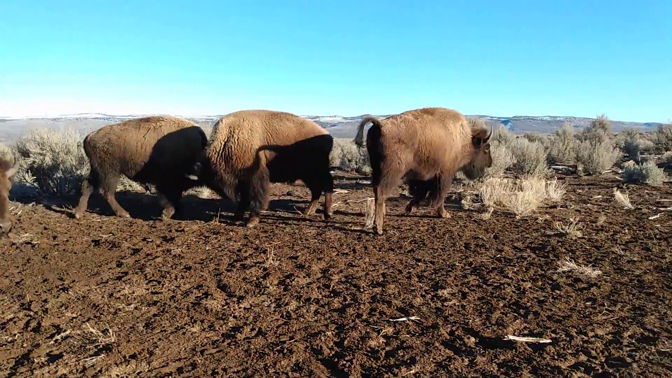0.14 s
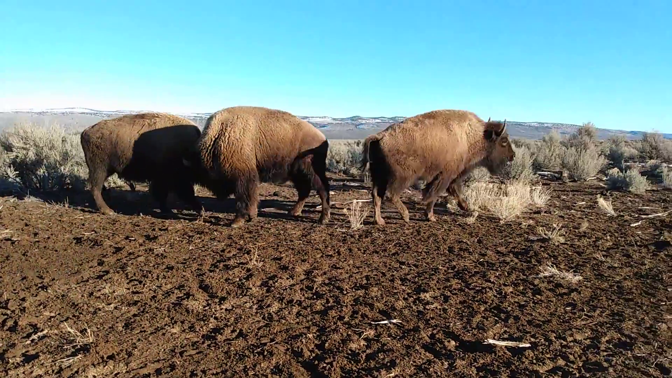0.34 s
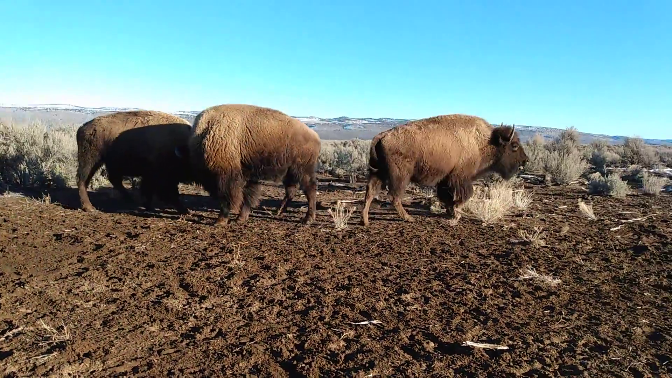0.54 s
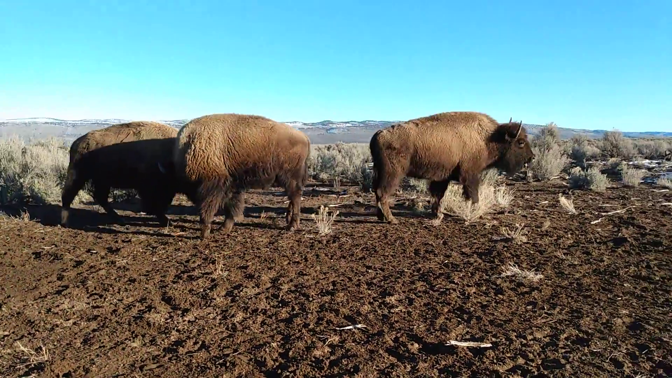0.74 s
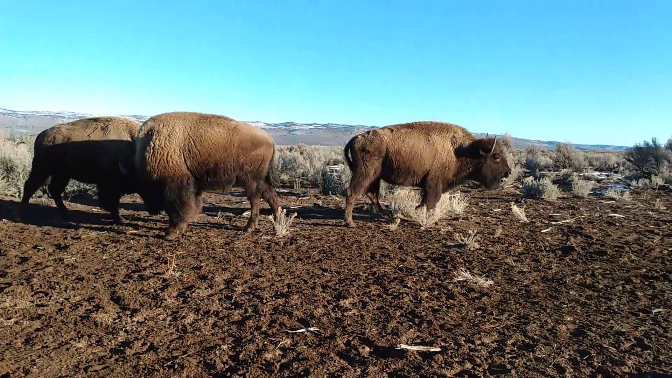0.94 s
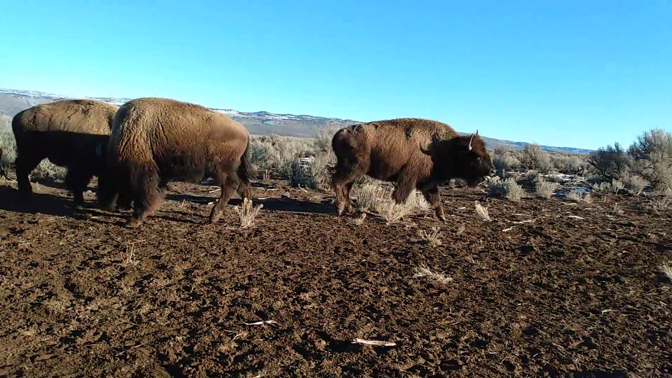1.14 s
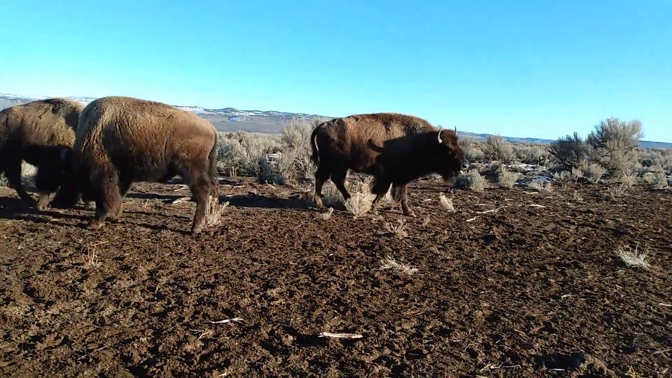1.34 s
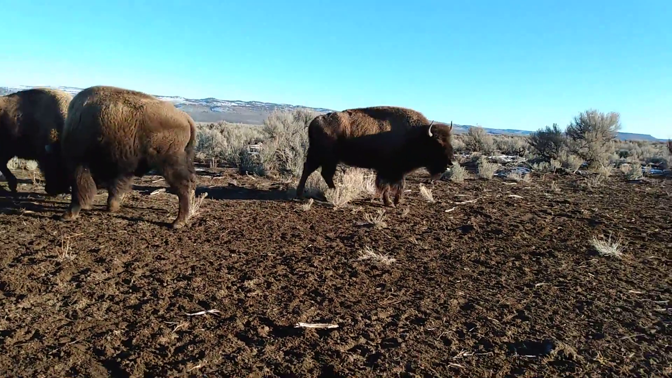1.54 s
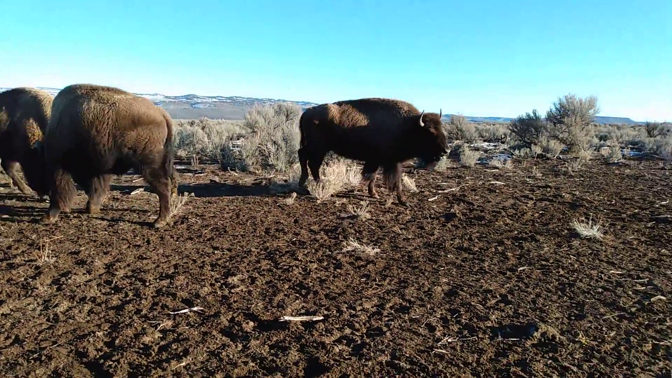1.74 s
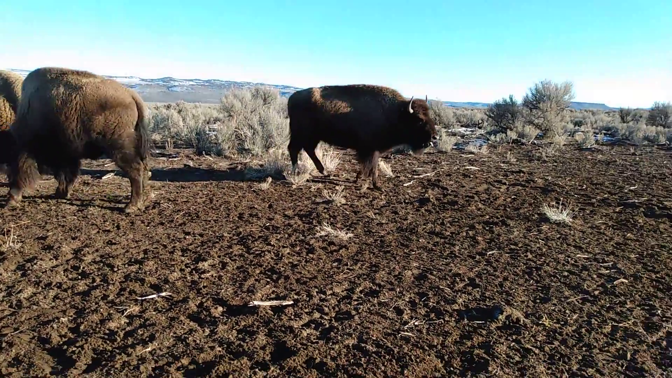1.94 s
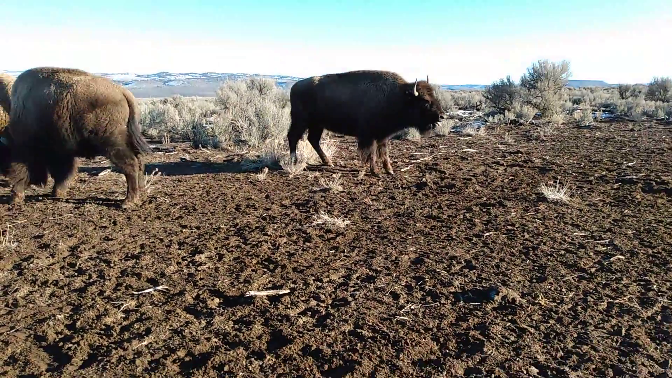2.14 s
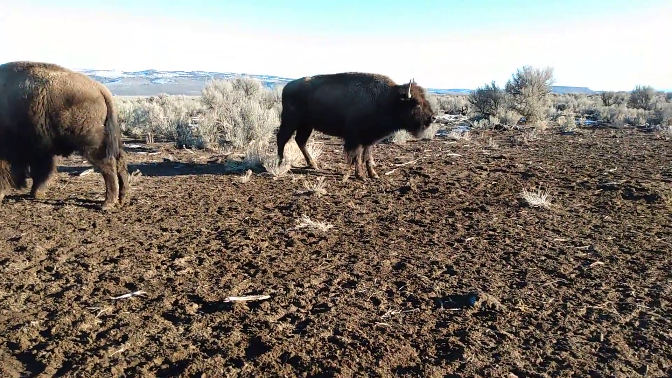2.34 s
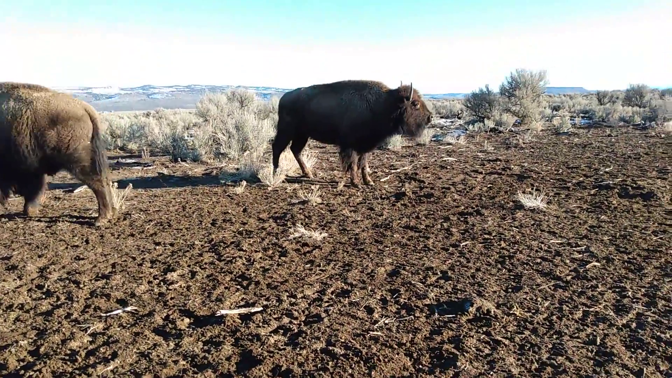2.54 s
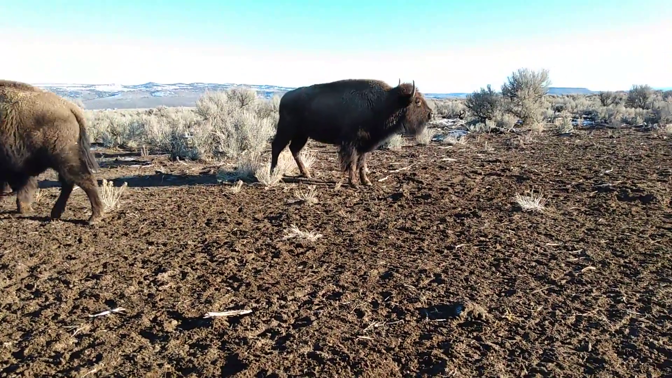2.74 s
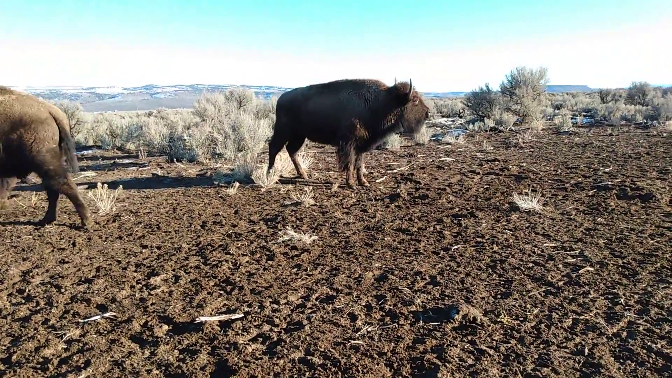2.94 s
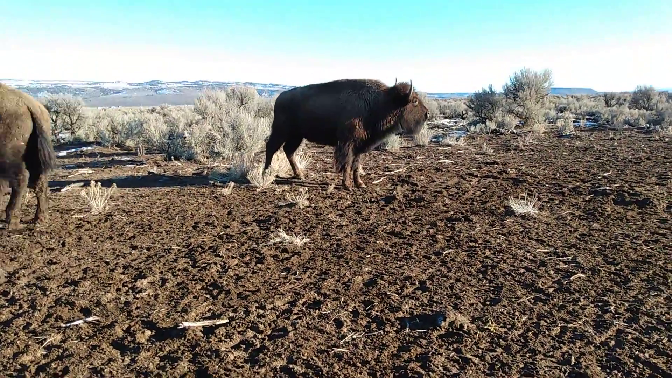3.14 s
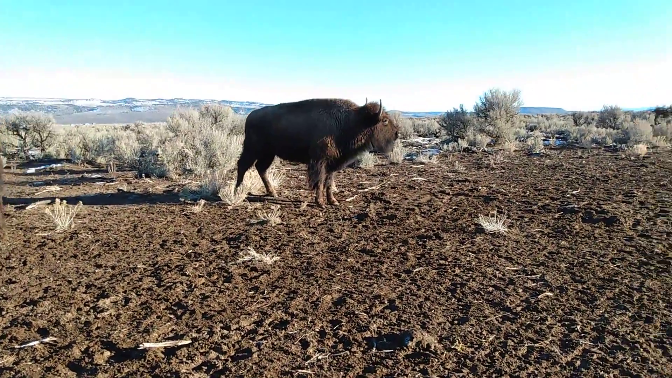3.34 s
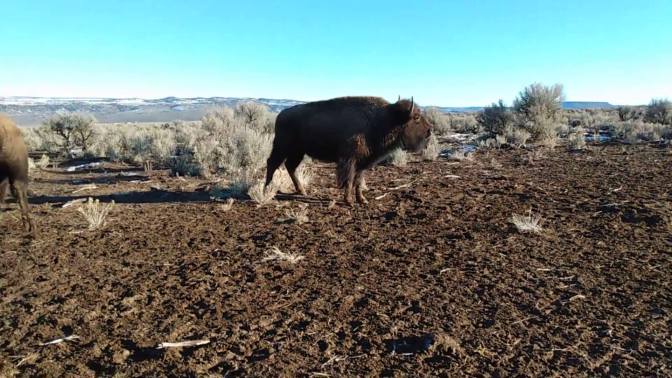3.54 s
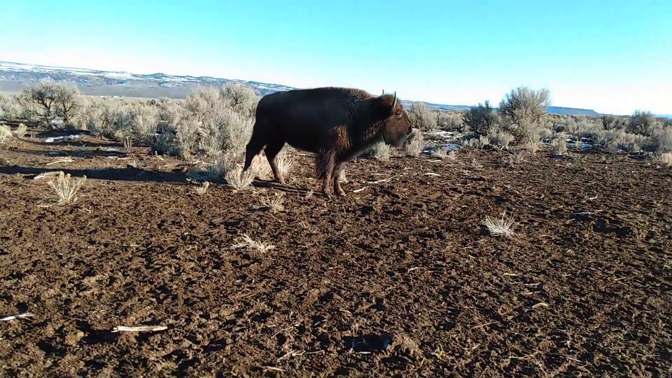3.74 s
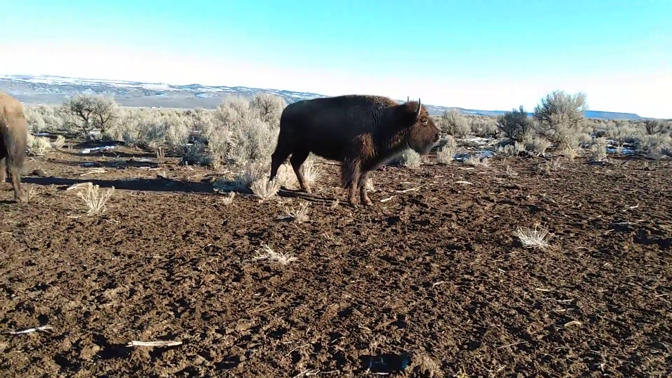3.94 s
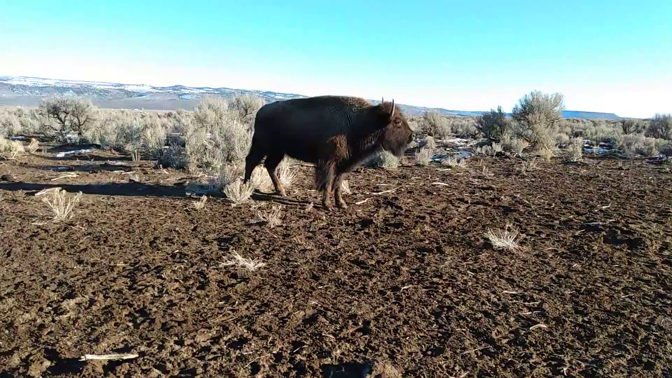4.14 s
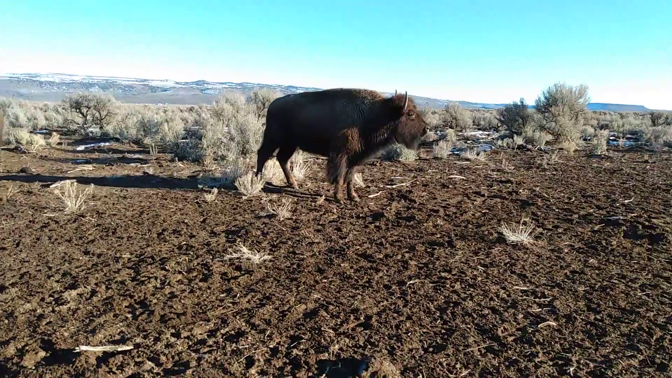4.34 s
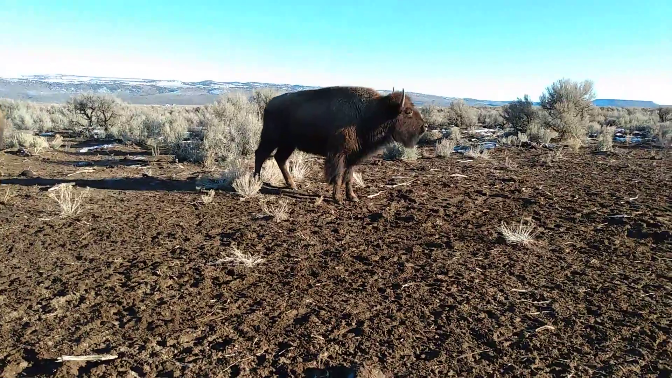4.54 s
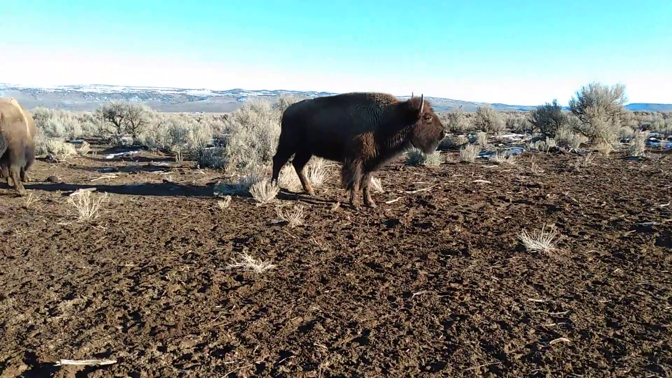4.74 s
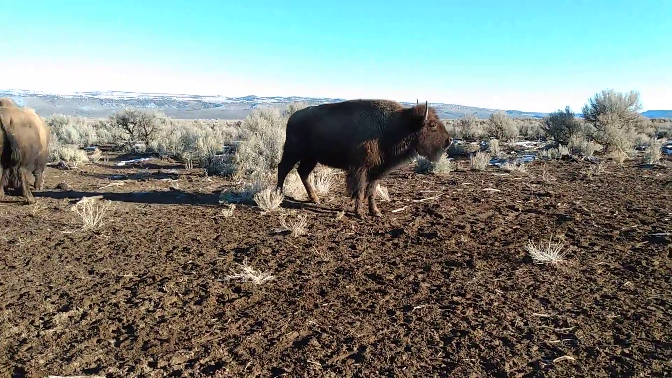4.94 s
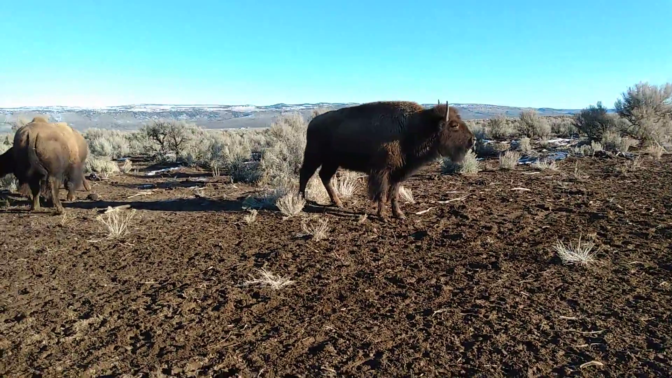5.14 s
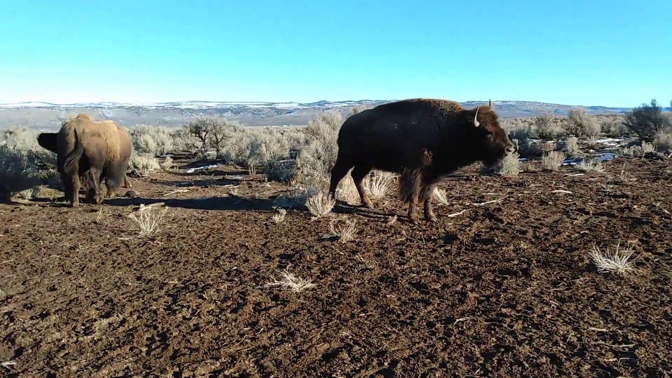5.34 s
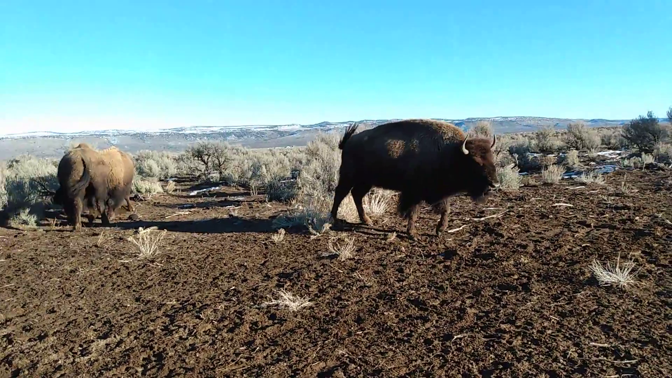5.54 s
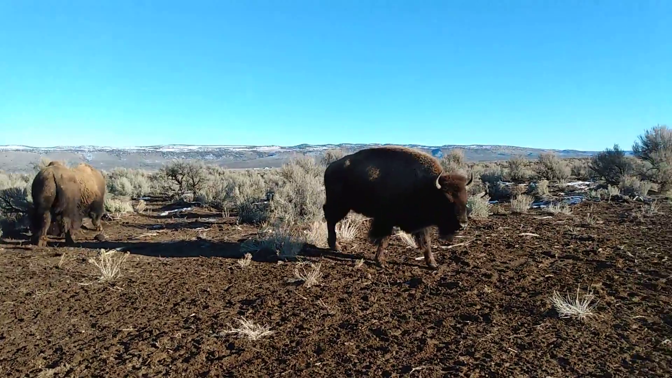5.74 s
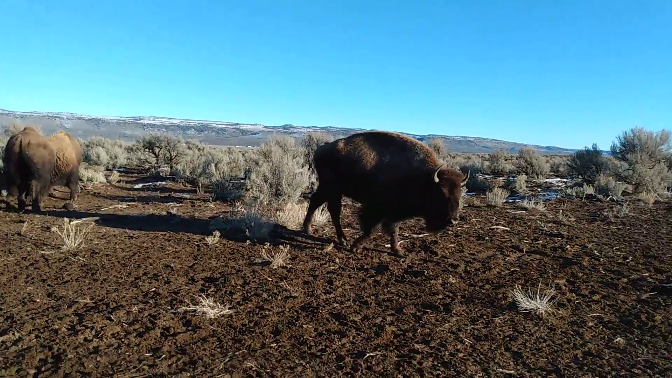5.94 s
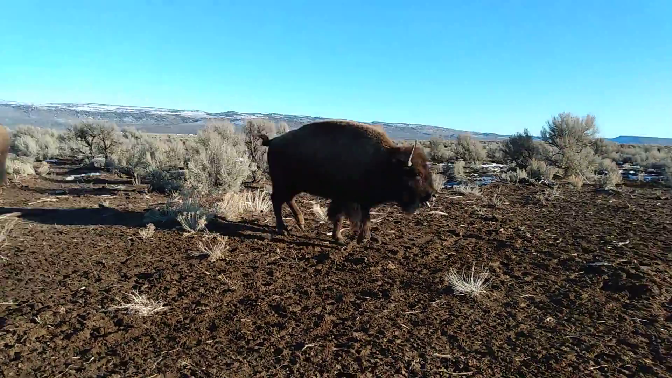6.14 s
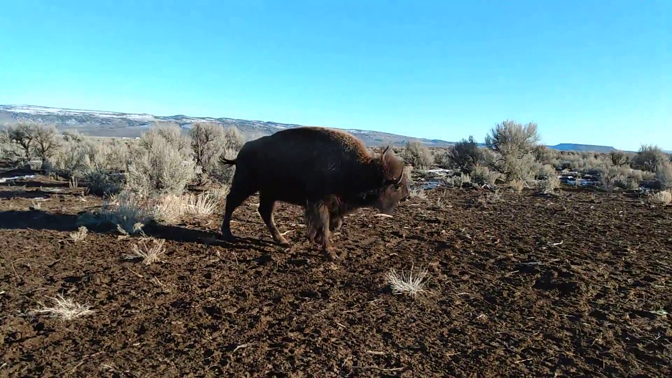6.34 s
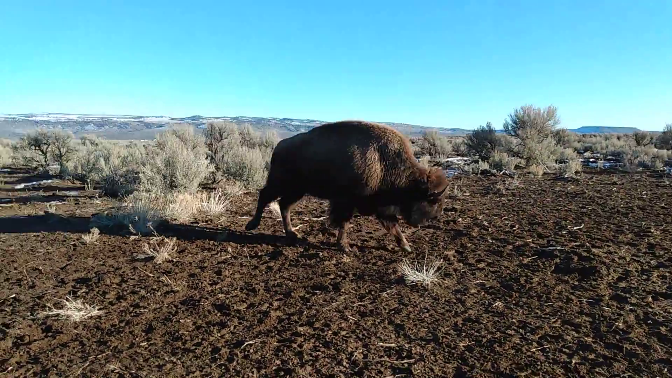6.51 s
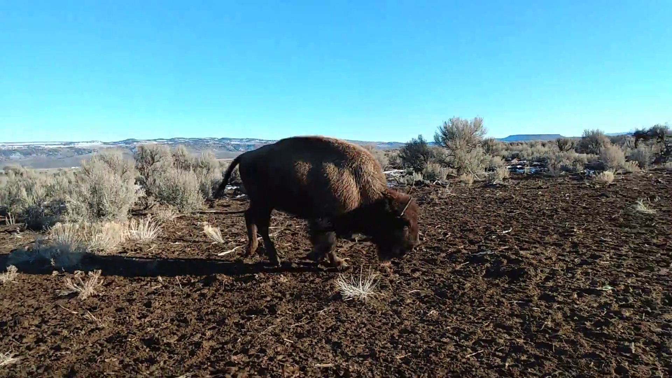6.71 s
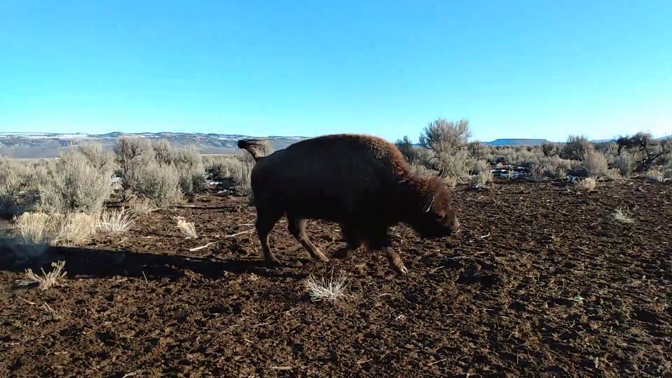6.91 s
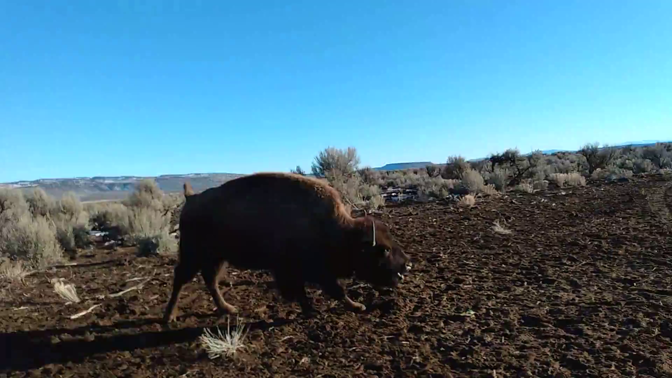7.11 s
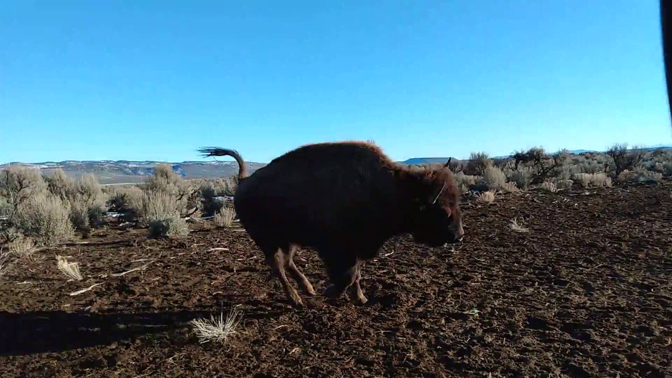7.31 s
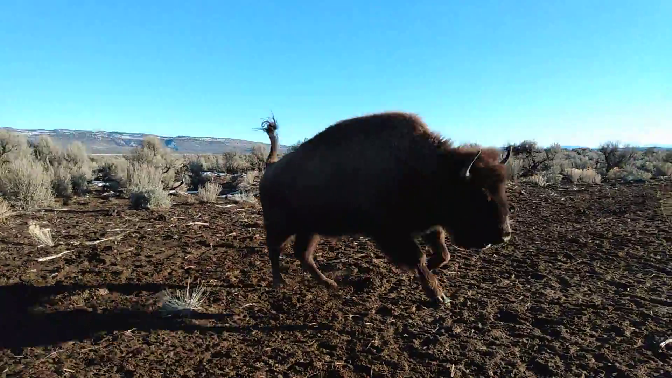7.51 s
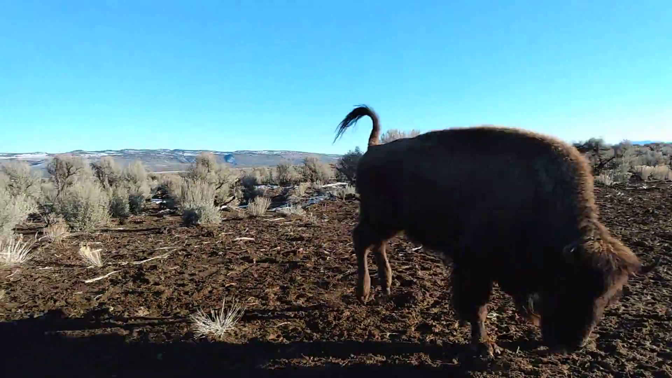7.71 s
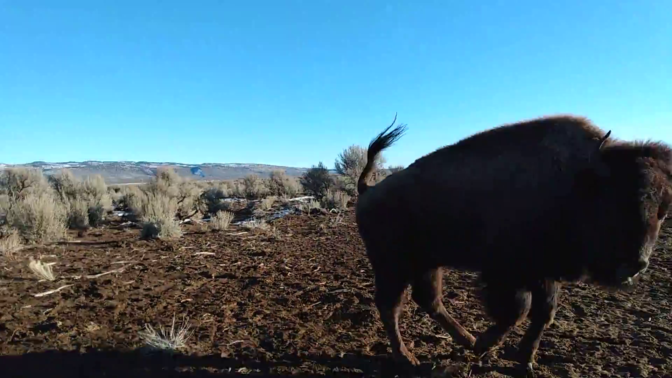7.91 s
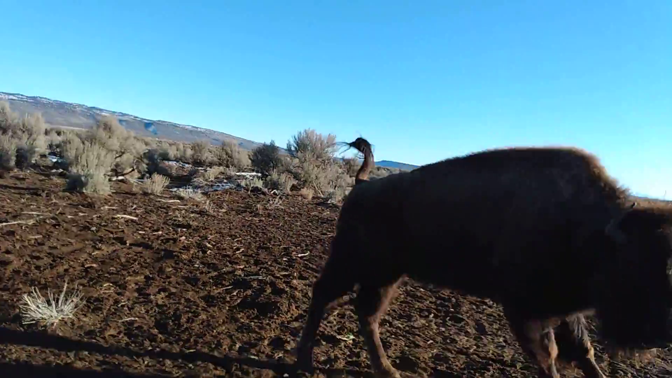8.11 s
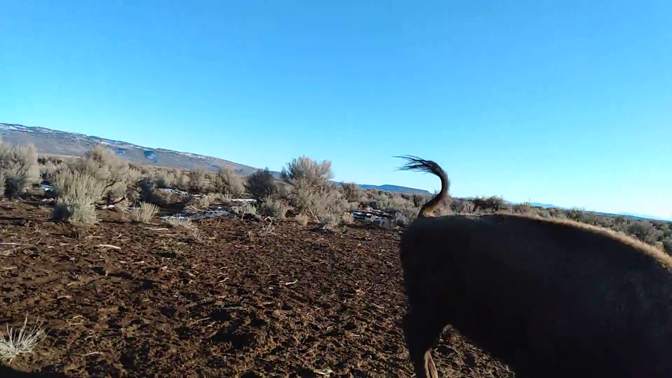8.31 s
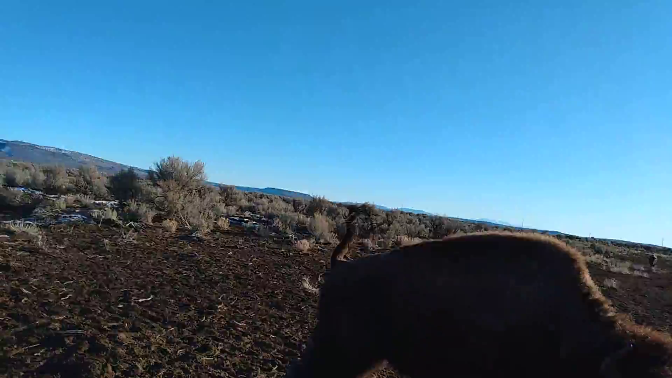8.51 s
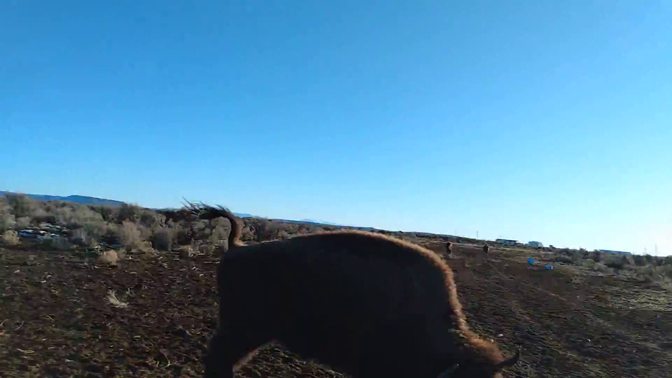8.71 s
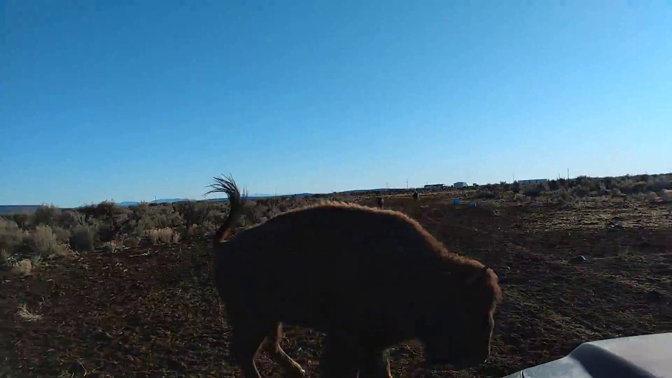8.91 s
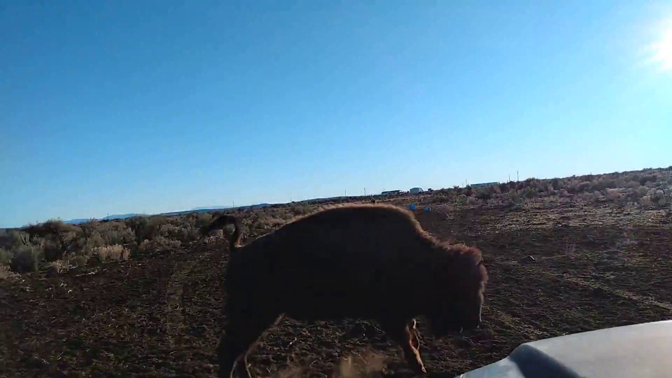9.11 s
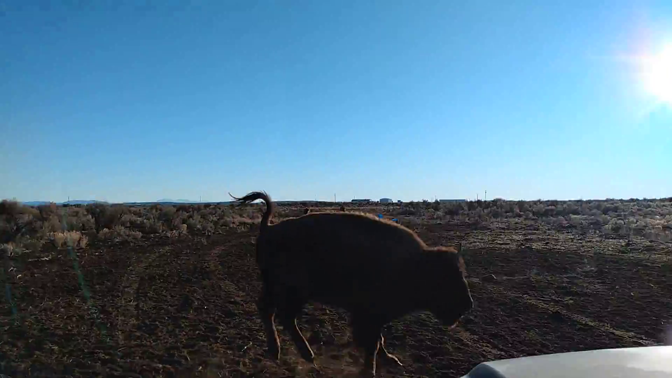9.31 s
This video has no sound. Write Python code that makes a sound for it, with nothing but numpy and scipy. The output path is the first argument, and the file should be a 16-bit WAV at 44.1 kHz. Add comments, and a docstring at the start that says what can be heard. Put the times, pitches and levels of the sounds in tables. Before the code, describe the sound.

A vehicle engine rumbles low while a bison trots close on crunching soil, snorting several times and giving one low, fluttering grunt.

```python
"""Dry open ground, heard from a creeping vehicle whose engine speeds up briefly a few times.
A bison trots close, its hooves crunching the soil. It snorts several times by blasting air through
its nose, gives one low grunt as slack throat tissue flaps, and snorts once more.
Something of metal clinks early on, and light gusts touch the microphone."""
import sys
import numpy as np
from scipy import signal
from scipy.fft import rfft, irfft
from scipy.io import wavfile

SR = 44100
rng = np.random.default_rng(int(sys.argv[2]) if len(sys.argv) > 2 else 0)


def output_pcm(signal):
    """Save a mono or channel-first signal as 16-bit PCM at the path in sys.argv[1].

    Samples are clipped to [-1, 1] before scaling.
    """
    pcm = np.clip(np.atleast_2d(signal).T, -1, 1) * 32767
    wavfile.write(sys.argv[1], SR, np.round(pcm).astype(np.int16))


N = 417186
TIME, FREQS = np.arange(N) / SR, np.arange(N // 2 + 1) * SR / N
BISON_DIRECT = 0.247   # share of the bison's noise that reaches both sides alike
# air rushing in the chest: pitch_hz, level_db
CHEST_COLOUR = [(40, 2.5), (75, 3.5), (200, 1.5), (350, 0), (550, -12.5), (1200, -18), (3000, -53)]


def grunt(pulse_s=0.00131, chest_ring_s=0.064, leak=0.072, crack=0.61, rough=.33, wobble=.025):
    """Slack tissue flaps about 35 times a second; each flap rings chest and throat and lets air rasp."""
    # how each part swells and fades: full_s, attack_s, hold_s, release_s, level_db
    pulse_shape = (8.5, 0.33, 0.15, 0.0053, -21.5)
    rasp_shape = (8.5, 0.01, 0.11, 0.17, -45.5)
    chest_shape = (8.5, 0.0962, 0.0039, 0.027, -13)
    rush_shape = (8.5, 0.0853, 0.1871, 0.07, -35)
    wheeze_shape = (8.5, 0.06, 0.12, 0.26, -53.5)
    # the chest's note sinks as the push ends: time_s, pitch_hz
    chest_pitch = [(8.38, 295), (8.465, 309.3), (8.51, 232.2), (8.63, 201.7)]
    # throat notes swell in turn as it changes shape:
    # pitch_hz, ring_s, full_s, attack_s, hold_s, release_s, level_db
    throat_notes = [(466, 0.0198, 8.456, .035, 0.029, .008, -19.5),
                    (572, 0.0202, 8.565, 0.0123, 0.0377, .04, -18.5),
                    (756, .016, 8.565, .03, 0.042, 0.075, -29.5),
                    (926, 0.042, 8.53, 0.091, 0.025, .055, -25),
                    (1171, .022, 8.51, 0.073, .003, .008, -24.5),
                    (1432, 0.036, 8.47, 0.0315, 0.015, .045, -23)]
    # air rasping through the flapping gap: pitch_hz, width_hz, level_db
    rasp_bands = [(1640, 260, 4.5), (2600, 600, 1), (3190, 340, 1.5), (4000, 340, -1), (4440, 414, -2),
                  (5150, 500, -6.5), (7500, 2370, -7), (12000, 4650, -5)]
    # the tissue catches once between two flaps: start_s, level_db, pitch_hz, ring_s
    catch = (8.4735, -20, 319.5, 0.0435)
    hiss, flow = hissing(rasp_bands), air()
    breath = air(CHEST_COLOUR) + from_db(-24.5) * hiss   # runs on between the flaps
    out = envelope(TIME, *rush_shape) * breath + thud(*catch)
    soft = signal.butter(2, 2200, fs=SR)   # soft tissue has no sharp edge
    rise_s, fall_s, crack_s = .0025, .0035, .0012
    times = flap_times(count=13)
    for s in times:
        span, t = around(s, reach_s=.1)
        early_s = rng.uniform(.005, .011)   # the tissue rattles: a weaker slap leads each flap
        slap = from_db(-12) * rng.uniform(.5, 1.5)
        opening = swell(t - .001, rise_s, fall_s) + slap * swell(t + early_s, crack_s, 2 * crack_s)
        opening += leak * swell(t, 0.026, 0.017)   # the flap never seals fully
        pulse = t / pulse_s * np.exp(.5 - .5 * (t / pulse_s) ** 2)   # suction, then the push
        snap = signal.lfilter(*soft, signal.unit_impulse(len(t), np.argmin(np.abs(t))))
        early_snap = signal.lfilter(*soft, signal.unit_impulse(len(t), np.argmin(np.abs(t + early_s))))
        chest = ring(snap, np.interp(s, *np.transpose(chest_pitch)), chest_ring_s)
        flap = envelope(s, *pulse_shape) * pulse + envelope(s, *chest_shape) * chest
        for hz, ring_s, *shape in throat_notes:
            hz *= 1 + wobble * rng.uniform(-1.08, 1)
            swirl = rough * opening * resonate(flow[:, span], hz, width_hz=197)
            flap = flap + envelope(s, *shape) * (ring(snap + slap * early_snap, hz, ring_s) + swirl)
        if s == times[-1]:
            flap *= from_db(8.5)   # the throat closes with a firmer flap
        burst = opening + crack * swell(t - crack_s, crack_s, crack_s)
        rasp = envelope(s, *rasp_shape) * burst * hiss[:, span]
        nose = resonate(flow[:, span], hz=4040, width_hz=740)
        wheeze = envelope(s, *wheeze_shape) * swell(t + crack_s, 2 * rise_s, fall_s) * nose
        strength = from_db(1.7 * rng.uniform(-0.82, 1))
        out[:, span] += strength * (flap + rasp + wheeze)
    return out


def flap_times(count, start_s=8.375, fastest_s=8.44, fastest_hz=37.15, slacken_s=.52):
    """When each flap comes; the gaps lengthen as the tissue slackens."""
    times = [start_s]
    for _ in range(count - 1):
        mid_cycle = times[-1] + .5 / fastest_hz
        times.append(times[-1] + (1 + ((mid_cycle - fastest_s) / slacken_s) ** 2) / fastest_hz)
    return times


def snorts():
    """Blasts through the nostrils ring two bands of pitch, then darken as the throat joins in."""
    # hiss of the nose passages: pitch_hz, width_hz, level_db
    nose_bands = [(1757, 320, -1.5), (2410, 290, 1), (2955, 320, 0.5), (3495, 294, -1.5), (3900, 710, -0.5),
                  (4880, 870, -2.5), (8000, 2300, -5.5), (12450, 5800, -5)]
    # blasts, the first far off: full_s, attack_s, hold_s, release_s, level_db, first_hz, second_hz,
    # width_share, sag_per_s, darken_s, second_db, throat_db, chest_db, hiss_db, edge_hz, edge_db
    blasts = [(.82, 0.052, .15, 0.123, -61, 850, 1650, 0.42, 0, .01, -2.5, -12.5, -5.5, -8.5, 3800, -12.5),
              (7.23, 0.0105, 0.0442, .018, -36, 1101, 1333, 0.304, 0.61, 0.021, -6, -9.5, -1.5, -23, 2900, -21),
              (7.328, 0.0355, 0.048, .016, -42.5, 883, 1245, 0.37, 0.34, 0.0383, -8, -6, 1, -15, 2600, -17.5),
              (7.803, 0.027, 0.024, .03, -41.5, 874, 1248, .35, .5, .004, -7.5, -5.5, 6.5, -20.5, 4310, -22),
              (7.843, 0.0165, 0.0231, 0.018, -46, 900, 1772, 0.264, -0.86, .002, 5, -6.5, 9.5, -6.5, 4000, -7.5),
              (7.907, 0.0052, 0.0079, 0.0099, -41, 810, 1800, 0.234, -0.078, .002, -10.5, -10.5, -7.5, -15.5, 5020, -17),
              (7.999, 0.0141, .02, 0.0084, -36.5, 996, 1604, 0.29, -0.014, 0.00195, -3, 2, -4, -19.5, 3400, -16),
              (8.02, 0.00356, 0.0057, .006, -30, 1062, 1500, 0.193, 1.5, 0.0039, -15.5, 0.5, -7.5, -32, 3450, -21.5),
              (8.335, .009, 0.0175, .012, -46.5, 998, 1400, .3, 0, .002, -12, -6.5, -0.5, -20.5, 4000, -22.5),
              (8.846, 0.0265, 0.053, 0.0323, -43.5, 1113, 1395, 0.314, 0, 0.0061, -8, -10, 9.5, -19.5, 3000, -21.5),
              (8.962, 0.0263, 0.0352, 0.0266, -32, 1077, 1574, 0.232, 1.103, 0.0249, -6, -13, -2.5, -23, 3000, -24.5),
              (9.018, .012, 0.0236, 0.0173, -39.5, 678, 1050, 0.296, -0.016, 0.00195, -5.5, -5, -8.5, -26, 5500, -25)]
    out, flow = np.zeros((2, N)), air(direct=BISON_DIRECT)
    rush, hiss = air(CHEST_COLOUR), hissing(nose_bands)
    flutter = from_db(2.3 * drift(70))
    throat = resonate(flow, hz=460, width_hz=200)
    for (s, attack, hold, release, db, first_hz, second_hz, width_share, sag, darken,
         second_db, throat_db, chest_db, hiss_db, edge_hz, edge_db) in blasts:
        span, t = around(s, reach_s=.4)
        first = sagging(flow[:, span], t, first_hz, width_share * first_hz, sag)
        second = sagging(flow[:, span], t, second_hz, width_hz=300, sag=sag)
        edge = from_db(edge_db) * resonate(flow[:, span], edge_hz, width_hz=600)
        breath = from_db(chest_db) * rush[:, span] + from_db(hiss_db) * hiss[:, span] + edge
        lead = 0.98 * attack   # the breath starts early
        out[:, span] += (envelope(t, -lead, attack, hold + lead, release, db) * breath
                         + envelope(t, -darken, attack, hold, release, db + second_db) * second
                         + envelope(t, 0, attack, hold, release, db) * first
                         + envelope(t, darken, attack, hold, release, db + throat_db) * throat[:, span])
    return out * flutter


def hooves_on_soil(floor_db=-80.5):
    """Dry soil breaks in clumps of tiny grains under each hoof, over a faint rustle and trickle."""
    # rustling ground and breaking grains: pitch_hz, level_db
    rustle_colour = [(3500, 3), (5500, -1), (6900, 3.5), (7900, -4), (9000, -4), (10000, -7), (11200, -0.5),
                     (12100, -1), (13200, 4.5), (14500, -2), (15600, -0.5), (18000, -22.5)]
    grain_colour = [(1500, 4), (4000, 3), (6800, -0.5), (9000, -3), (11000, -1), (13000, 5), (16000, 5.5),
                    (19000, -17.5)]
    # spells of scuffing: peak_s, rise_s, fall_s, hiss_db, grit_db
    scuffs = [(.75, .04, .04, -77.5, -73.5), (1.87, 0.058, .13, -68.5, -78), (2.9, 0.135, .13, -83.5, -73),
              (3.62, .18, 0.28, -71.5, -67), (4.25, 0.1707, .35, -81, -71),
              (6.33, 0.098, 0.041, -63.5, -72.5), (7.38, 0.132, .26, -66.5, -67),
              (8.55, 0.148, .25, -68.5, -79.5)]
    # hooves crushing soil and twigs: peak_s, level_db, attack_s, decay_s, pitch_hz
    crunches = [(.773, -63, .002, .003, 13000), (.985, -64, .002, .003, 13000),
                (1.06, -65, .003, .004, 13500), (1.715, -63, .003, .008, 5000),
                (2.228, -59, .001, .002, 12000), (2.68, -57, .002, .006, 4800),
                (2.877, -63, .001, .003, 6000), (3.017, -60, .001, .003, 13000),
                (3.049, -64, .001, .002, 10000), (3.395, -64, .001, .003, 11000),
                (3.604, -60, .001, .004, 12500), (3.868, -57, .001, .003, 7000),
                (3.9, -60, .001, .003, 12500), (3.951, -60, .002, .008, 5200),
                (4.468, -59, .001, .003, 9000), (4.713, -64, .002, .003, 8800),
                (4.787, -66, .001, .002, 7000), (5.05, -63, .002, .005, 7000),
                (5.084, -61.5, .002, .009, 6000), (6.644, -57, .001, .003, 11000),
                (6.656, -43.5, .001, .004, 7500), (6.773, -40, .001, .007, 1600),
                (6.788, -55, .003, .018, 6500), (6.805, -55, .002, .05, 6500),
                (6.822, -55.5, .004, .04, 13000), (6.892, -57, .003, .014, 12500),
                (7.29, -58, .04, .045, 10000), (7.433, -45.5, .002, .014, 6500),
                (7.456, -51, .002, .01, 7000), (7.477, -46.5, .002, .005, 7000),
                (7.556, -50, .001, .002, 10000), (7.583, -46, .002, .014, 2900),
                (7.585, -39.5, .002, .009, 6500), (7.59, -37.5, .001, .004, 11000),
                (7.623, -55, .002, .008, 11000), (7.637, -58, .003, .025, 8000),
                (7.7, -58, .012, .014, 6500), (7.864, -41, .003, .004, 2800),
                (8.179, -47, .001, .002, 11000), (8.248, -56, .003, .025, 5500),
                (8.878, -39, .0005, .0015, 12000)]
    rustle = air(rustle_colour)
    spells = np.array([swell(TIME - s, rise, fall) for s, rise, fall, *_ in scuffs])
    hiss, trickle = from_db(np.transpose(scuffs)[-2:]) @ spells
    out = (from_db(floor_db) + hiss) * rustle + trickle * grit(rustle)
    grains = air(grain_colour, BISON_DIRECT) * rms_one(from_db(4 * drift(400)))
    for s, db, attack, decay, hz in crunches:
        span, t = around(s)
        band = resonate(grains[:, span], hz, width_hz=.7 * hz)
        spray = .7 * min(1, hz / 6000) * grains[:, span]
        out[:, span] += envelope(t, 0, attack, 0, decay, db) * (band + spray)
    return out


def grit(rustle, grains_per_s=130, spread_db=4.5, decay_s=.0009):
    """Tiny grains of uneven size fall, each a brief burst in one of four high bands."""
    out, count = 0, int(grains_per_s * N / SR)
    for hz in (6800, 11000, 13000, 14000):
        falls = np.zeros(N)
        falls[rng.integers(0, N, count)] = from_db(spread_db * np.minimum(rng.exponential(1, count), 3.5))
        bursts = signal.lfilter([1], [1, -np.exp(-1 / (decay_s * SR))], falls + 1e-18)
        out = out + bursts * resonate(rustle, hz, hz / 2)
    return rms_one(out)


def knocks():
    """Dull knocks and hoof thuds, each one low note that dies quickly."""
    # blows: start_s, level_db, pitch_hz, ring_s
    blows = [(3.951, -26, 441.4, 0.0416), (4.638, -29, 288, 0.082), (6.486, -25.5, 190.7, 0.062),
             (6.779, -34, 546, .06), (7.84, -20, 69.9, 0.156), (8.624, -21.5, 85, 0.063)]
    return sum(thud(*blow) for blow in blows)


def engine(rumble_db=-40, whirr_db=-47, db_per_octave=9.5, throb=0.196, boom_hz=128, boom_width_hz=17):
    """Speed sets pitch and loudness; tones swell where the body booms, and the exhaust throbs."""
    # the idle steps up once: time_s, firing_hz
    idle = [(.88, 46.7), (1.22, 50.51)]
    # touches of the throttle: peak_s, rise_s, fall_s, added_hz
    revs = [(2.31, 0.2923, 0.3385, 19.2), (7.25, 0.2516, 0.301, 11.3), (7.87, 0.12968, 0.1804, 7.5),
            (8.88, 0.1497, 0.1787, 7.2)]
    # strength of the low firing tones and of the body's drone: time_s, level_db
    firing_level = [(0, -42), (1.3, -46.5), (1.8, -41), (2.3, -39.5), (3.1, -43), (4.4, -38), (6.1, -38.5),
                    (7.5, -43), (8.4, -39.5), (9.46, -38)]
    drone_level = [(0, -57.5), (1.4, -56), (1.85, -40), (2.3, -42), (3.3, -53), (4.1, -43), (5.3, -44),
                   (6.1, -46), (6.7, -42.5), (7.3, -43.5), (9.46, -48.5)]
    # louder as the microphone turns towards the bonnet: time_s, gain_db
    facing = [(1.3, -1.24), (3, 0), (6.3, -0.4143), (7.3, 0.89), (9.46, 2.06)]
    # the whirr's treble dulls late on: time_s, gain_db
    whirr_treble = [(0, -0.34), (6.5, 0), (8.1, -1.2), (9.1, -4)]
    # tones of the engine and the parts it drives: times_firing_rate; and for each, gain_db
    multiples = [.623, .75, 1, 2, 2.37, 2.625, 3.67]
    tone_gains = [-19.5, -5.5, .5, -7.5, -12, -11, -17.5]
    # exhaust rumble and engine-bay whirr: pitch_hz, level_db
    rumble_colour = [(20, -8), (30, -9.5), (40, -10.5), (60, 1), (85, 0), (135, 0.63), (170, -4), (225, -6),
                     (320, -7), (430, -14), (700, -49.5)]
    whirr_colour = [(250, -3.5), (420, -3.5), (520, -1.5), (660, -1.5), (820, -5), (1080, -5.5),
                    (1400, -11), (1750, -10.5), (2400, -14.5), (3500, -21), (4600, -28.5), (6500, -42),
                    (9000, -76)]
    firing_hz = in_time(idle) + sum(hz * swell(TIME - s, rise, fall) for s, rise, fall, hz in revs)
    boost_db = db_per_octave * np.log2(firing_hz / idle[-1][1]) + in_time(facing)
    load_db = rumble_db + boost_db
    firings = np.cumsum(firing_hz) / SR
    shaft, tones = firings + 0.0461 * drift(2), 0
    for k, db in zip(multiples, tone_gains):
        boom_db = 5.5 * np.exp(-((k * firing_hz - boom_hz) / boom_width_hz) ** 2)
        source_db = in_time(firing_level) if k <= 1 else load_db   # upper tones grow with the load
        gain = from_db(source_db + db + boom_db + drift(3))
        tones = tones + gain * np.sin(2 * np.pi * (k * shaft + rng.random()))
    rumble = from_db(load_db) * air(rumble_colour) * (1 + throb * np.cos(2 * np.pi * firings))
    whirr = from_db(whirr_db + boost_db + 0.61 * drift(15)) * air(whirr_colour)
    treble = signal.sosfiltfilt(signal.butter(2, 1800, "high", fs=SR, output="sos"), whirr)
    whirr += (from_db(in_time(whirr_treble)) - 1) * treble
    drone = from_db(in_time(drone_level)) * resonate(air(), hz=118, width_hz=36)
    return np.sqrt(2) * tones + rumble + drone + whirr


def clinks(build_s=.002):
    """Light touches ring a small piece of metal; the ring builds up without a click."""
    # touches: start_s, level_db, low_notes_extra_db, high_notes_extra_db
    touches = [(.233, -48.5, 0, -2.5), (.273, -66.5, 17.5, 7), (1.303, -63.5, 5, 6), (1.345, -71, 0, -4),
               (2.329, -61, 0, -6), (2.356, -61.5, 0, -3)]
    # the metal's own notes: pitch_hz, gain_db, ring_s
    metal_notes = [(4250, -13, .09), (5250, -13.5, 0.061), (7180, 7.5, 0.062), (7222, 15.5, 0.108),
                   (7350, 4, .045), (10035, -11.5, .12), (11190, -11.5, 0.103), (12900, -17, .08)]
    out = np.zeros(N)
    for s, db, low_db, high_db in touches:
        span, t = around(s)
        t = np.maximum(t, 0)
        for hz, note_db, ring_s in metal_notes:
            gain = from_db(db + note_db + low_db * (hz < 6000) + high_db * (hz > 9000))
            shape = (1 - np.exp(-t / build_s)) * from_db(-60 * t / ring_s)
            out[span] += gain * shape * np.sin(2 * np.pi * hz * t)
    return out


def wind(breeze_db=-59, lump_db=3):
    """Air swirls separately at each side of the microphone: a low, lumpy breeze and a few gusts."""
    # swirling air: pitch_hz, level_db
    wind_colour = [(20, -16), (45, -3.5), (90, 3.5), (160, -4), (300, -11), (700, -34.5), (2000, -71)]
    # gusts: peak_s, width_s, left_db, right_db
    gusts = [(7.4, 0.085, -44, -53), (7.78, 0.077, -32.5, -40), (8.16, 0.0224, -27.5, -38),
             (8.36, 0.044, -26.5, -35.5), (8.8, 0.056, -43, -39.5)]
    swirls = irfft(rfft(rng.standard_normal((2, N))) * from_db(at_hz(wind_colour, FREQS)), N)
    strength = from_db(breeze_db)
    for s, width, left_db, right_db in gusts:
        strength = strength + from_db([[left_db], [right_db]]) * swell(TIME - s, width, width)
    return strength * rms_one(swirls * from_db(lump_db * drift(16)))


def air(colour=None, direct=0):
    """Stereo noise, alike on both sides in the bass and less so higher up, bar its direct share."""
    # how alike left and right are: pitch_hz, likeness (0 to 1)
    likeness = [(60, .97), (250, .95), (600, .87), (1200, .72), (2200, .3), (5000, .22), (14000, .15)]
    real, imaginary = rng.standard_normal((2, 2, len(FREQS)))
    mid, side = real + 1j * imaginary
    alike = np.clip(direct + (1 - direct) * at_hz(likeness, FREQS), 0, 1)
    both = np.sqrt(1 + alike) * mid + np.sqrt(1 - alike) * side * [[1], [-1]]
    return rms_one(irfft(both * (1 if colour is None else from_db(at_hz(colour, FREQS))), N))


def hissing(bands):
    """Rushing air coloured by narrow passages."""
    flow = air(direct=BISON_DIRECT)
    return rms_one(sum(from_db(db) * resonate(flow, hz, width) for hz, width, db in bands))


def resonate(x, hz, width_hz):
    """Keep one band of pitch; white noise comes out as strong as it went in."""
    edges = np.clip([hz - width_hz / 2, hz + width_hz / 2], [20, 40], [SR * .45, SR * .47])
    band = signal.butter(2, edges, "band", fs=SR, output="sos")
    return signal.sosfilt(band, x) * np.sqrt(SR / 2 / width_hz)


def sagging(x, t, hz, width_hz, sag):
    """A band that, from t = 0, slides down by the share sag each second (up if negative)."""
    slide = np.exp(-1j * np.pi * sag * hz * np.maximum(t, 0) ** 2)
    return np.real(signal.hilbert(resonate(x, hz, width_hz)) * slide)


def ring(clicks, hz, ring_s):
    """Each click starts a tone that fades by 60 dB in ring_s."""
    keep, angle = from_db(-60 / (ring_s * SR)), 2 * np.pi * hz / SR
    return signal.lfilter([0, np.sin(angle)], [1, -2 * keep * np.cos(angle), keep * keep], clicks + 1e-18)


def thud(s, db, hz, ring_s):
    """One struck, fading tone."""
    return from_db(db) * ring(signal.unit_impulse(N, round(s * SR)), hz, ring_s)


def envelope(t, full_s, attack, hold, release, db):
    """Grows to its level at full_s, holds, then dies away."""
    since = t - full_s
    return from_db(db) * np.exp(np.minimum(since, 0) / attack - np.maximum(since - hold, 0) / release)


def swell(t, rise, fall):
    """A smooth hump that peaks at t = 0."""
    return np.exp(-.5 * (t / np.where(t < 0, rise, fall)) ** 2)


def drift(rate_hz):
    """A random wander of typical size 1."""
    points = rng.standard_normal(4096)
    return rms_one(np.interp(TIME * rate_hz * 2, np.arange(len(points)), points))


def around(s, reach_s=.25):
    """The samples near an event, and their time from it."""
    span = slice(max(0, int((s - reach_s) * SR)), int((s + reach_s) * SR))
    return span, TIME[span] - s


def in_time(points):
    """A curve's value at every sample."""
    return np.interp(TIME, *np.transpose(points))


def at_hz(points, hz):
    """A curve's value at each pitch, with octaves evenly spaced."""
    pitches, values = np.transpose(points)
    return np.interp(np.log(hz + 1), np.log(pitches), values)


def from_db(db):
    """Decibels to gain."""
    return 10 ** (np.asarray(db) / 20)


def rms_one(x):
    """Scale to an average strength (rms) of 1."""
    return x / np.sqrt(np.mean(x ** 2) + 1e-20)


def arrive(x, lag_s):
    """Sound reaches the right side later than the left."""
    return np.array([x[0], irfft(rfft(x[1]) * np.exp(-2j * np.pi * FREQS * lag_s), N)])


def scene():
    """Open air: everything arrives directly, with no walls to echo."""
    around_vehicle = arrive(engine() + clinks() + hooves_on_soil() + knocks(), lag_s=.0002)
    return around_vehicle + arrive(grunt(), lag_s=.00017) + arrive(snorts(), lag_s=.00007) + wind()


def record(dry, cutoff_hz=15800):
    """Each side of the microphone has its own tone; the highest treble is cut."""
    # balance between the sides: pitch_hz, left_minus_right_db
    lean = [(60, -.6), (250, -.3), (650, 0), (1300, -2), (2800, -2.8), (4500, -1.2), (8000, .8),
            (14000, .8)]
    sides = from_db(at_hz(lean, FREQS) / 2 * np.array([[1], [-1]]))
    low_pass = signal.ellip(12, .1, 80, cutoff_hz, fs=SR, output="sos")
    return signal.sosfilt(low_pass, irfft(rfft(dry) * sides, N))


dry = scene()
out = record(dry)
output_pcm(out)
```